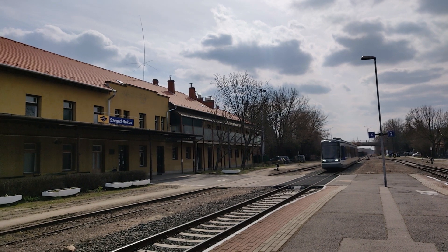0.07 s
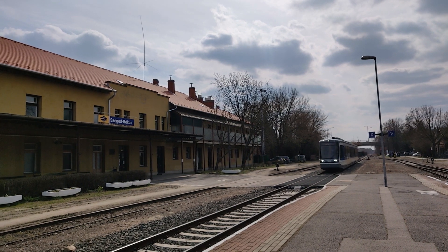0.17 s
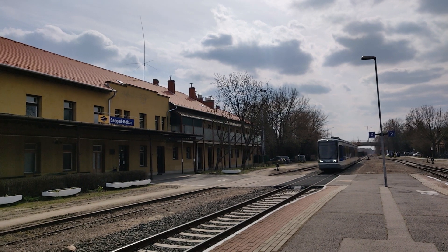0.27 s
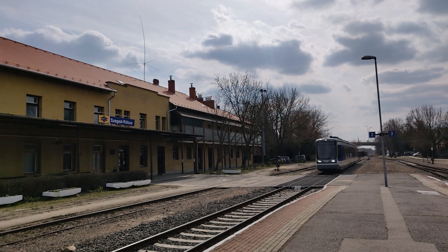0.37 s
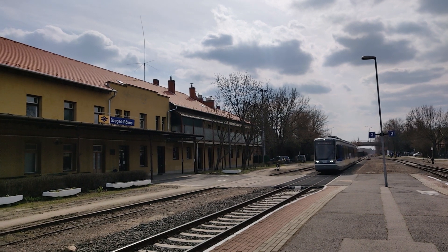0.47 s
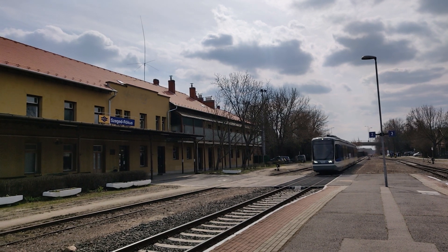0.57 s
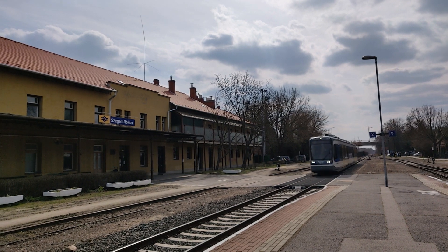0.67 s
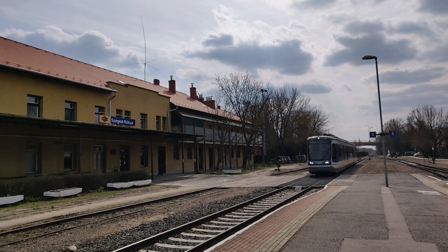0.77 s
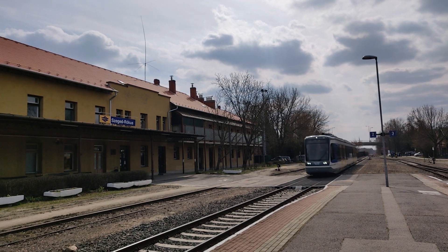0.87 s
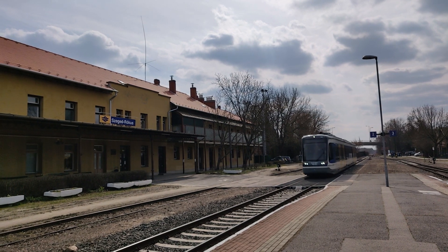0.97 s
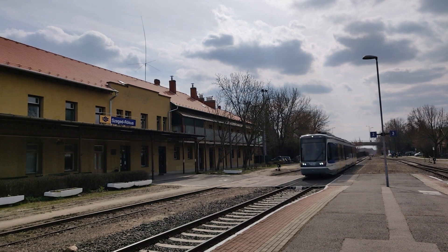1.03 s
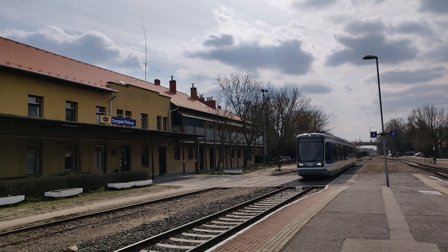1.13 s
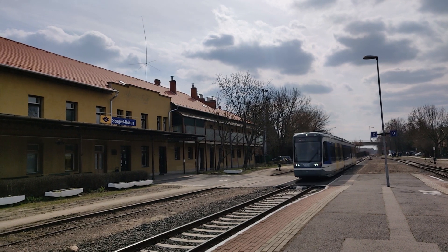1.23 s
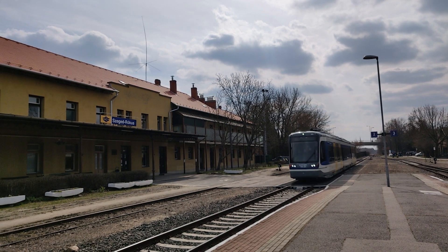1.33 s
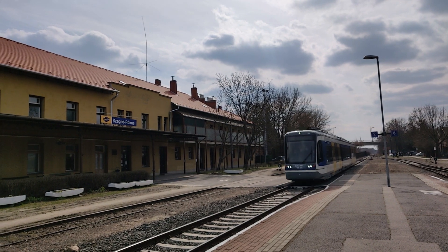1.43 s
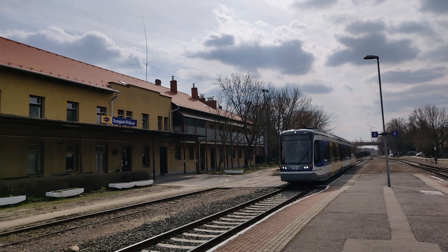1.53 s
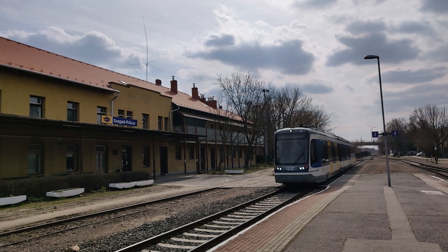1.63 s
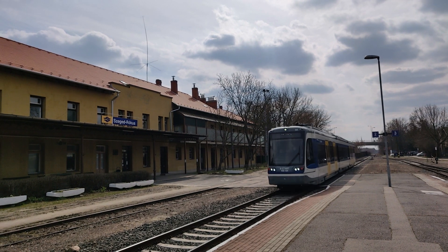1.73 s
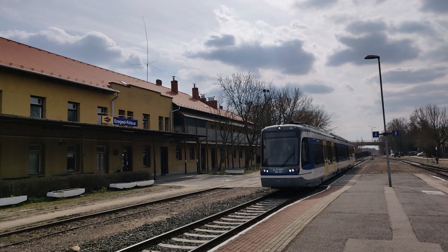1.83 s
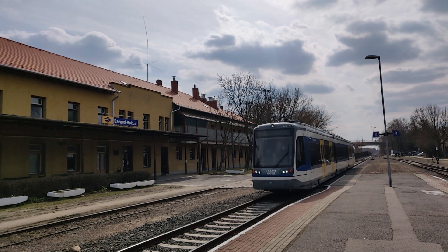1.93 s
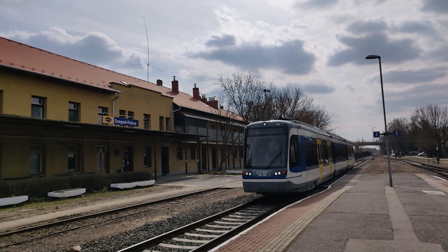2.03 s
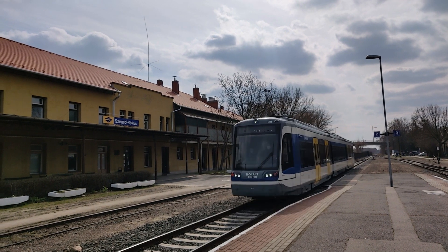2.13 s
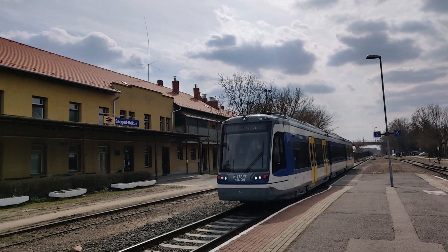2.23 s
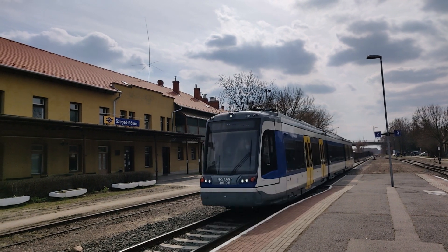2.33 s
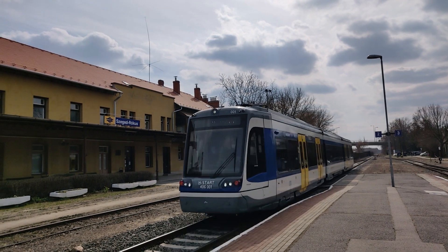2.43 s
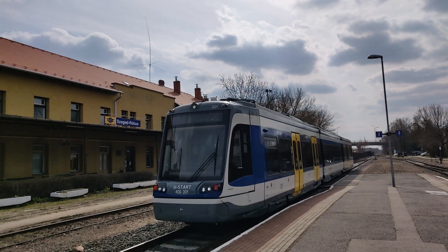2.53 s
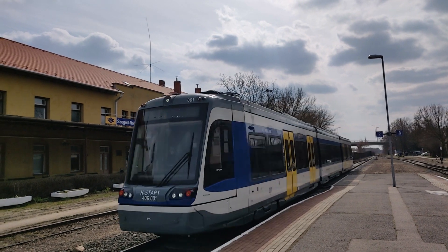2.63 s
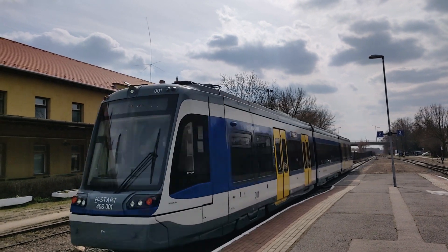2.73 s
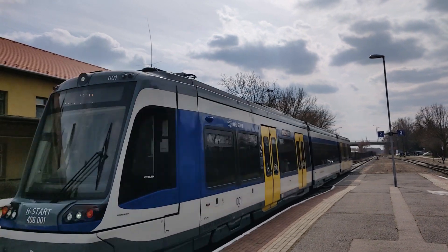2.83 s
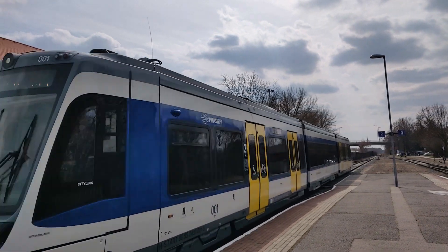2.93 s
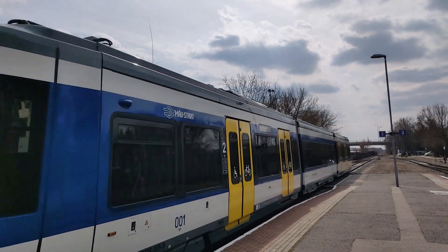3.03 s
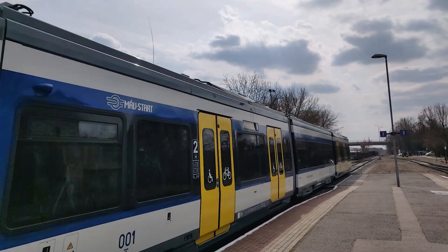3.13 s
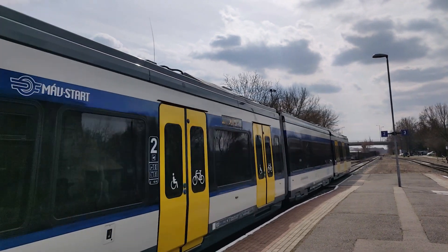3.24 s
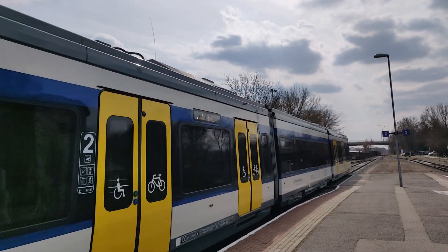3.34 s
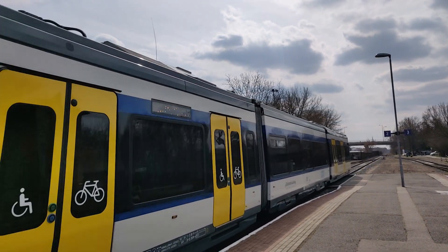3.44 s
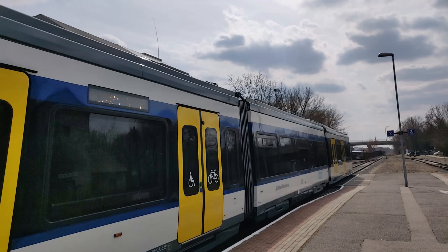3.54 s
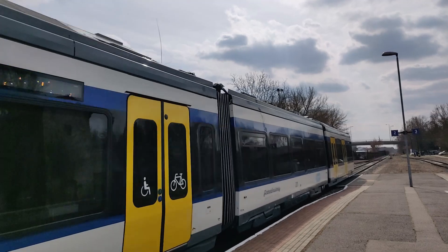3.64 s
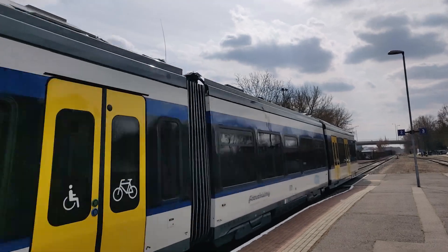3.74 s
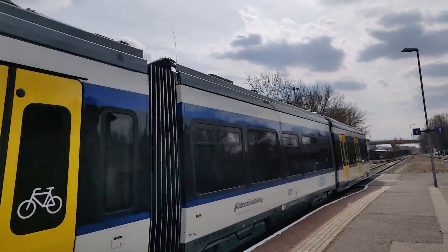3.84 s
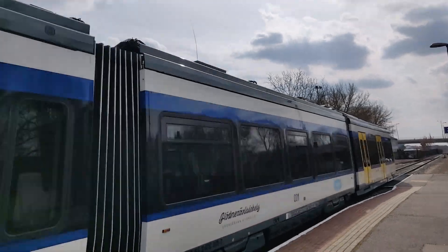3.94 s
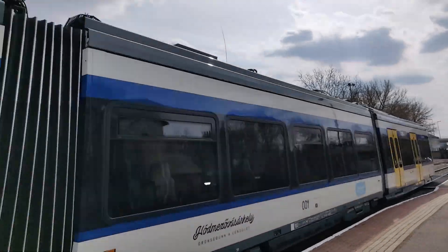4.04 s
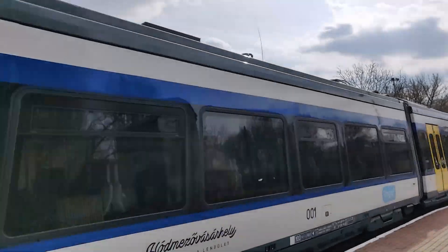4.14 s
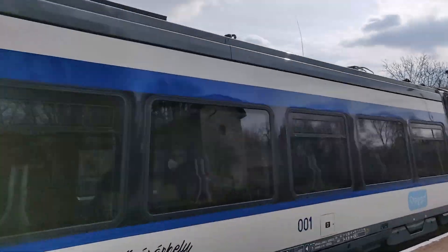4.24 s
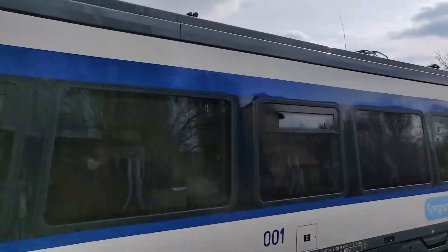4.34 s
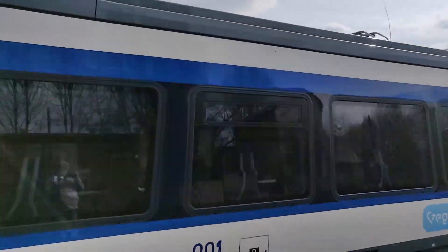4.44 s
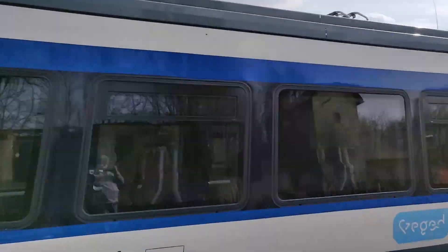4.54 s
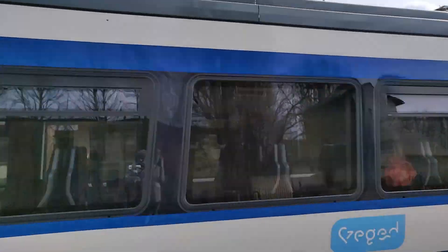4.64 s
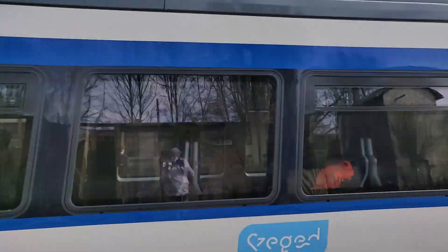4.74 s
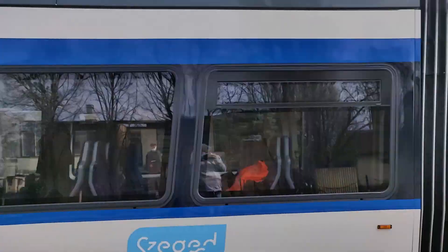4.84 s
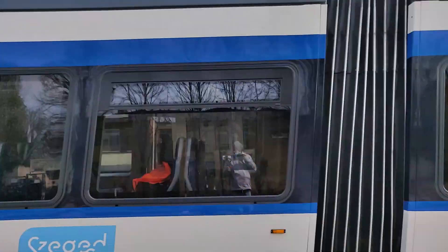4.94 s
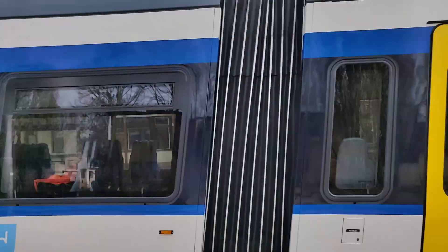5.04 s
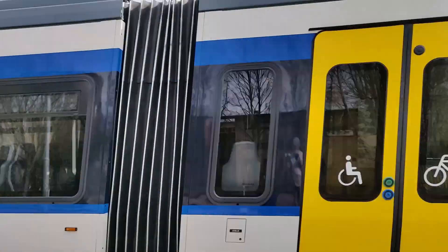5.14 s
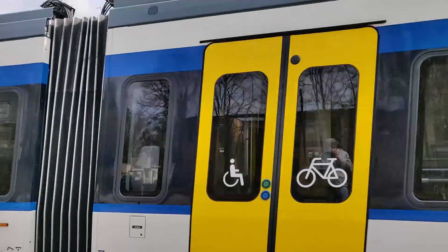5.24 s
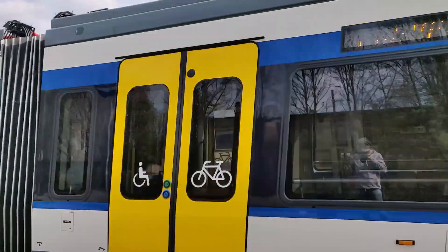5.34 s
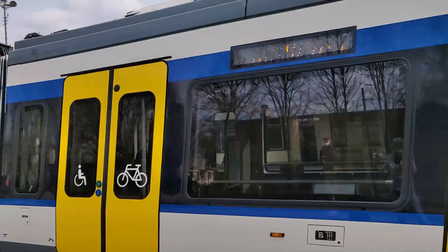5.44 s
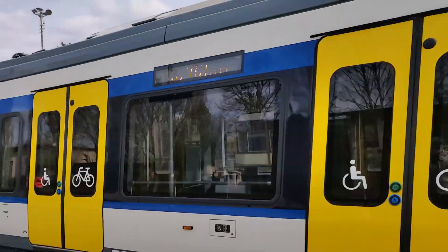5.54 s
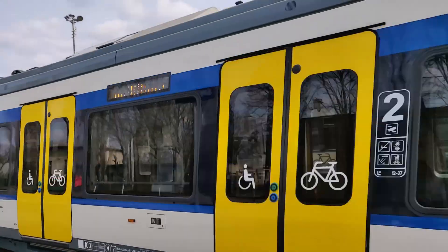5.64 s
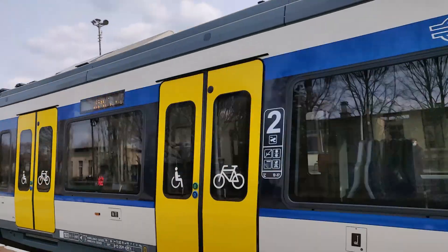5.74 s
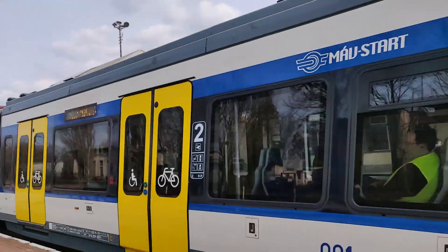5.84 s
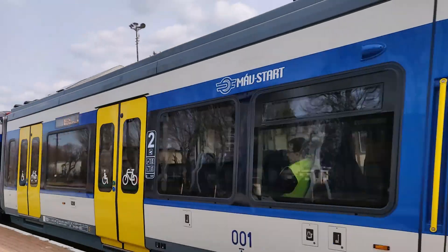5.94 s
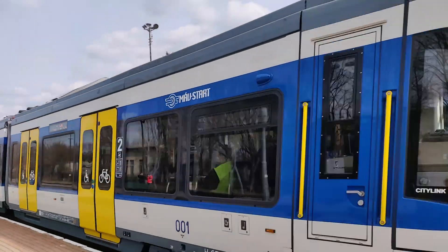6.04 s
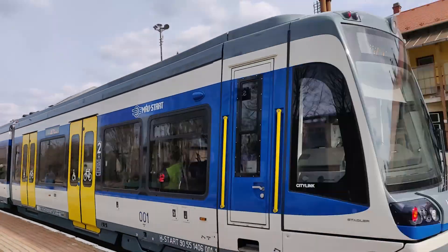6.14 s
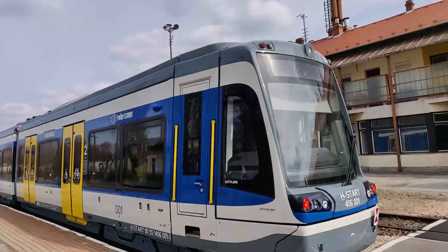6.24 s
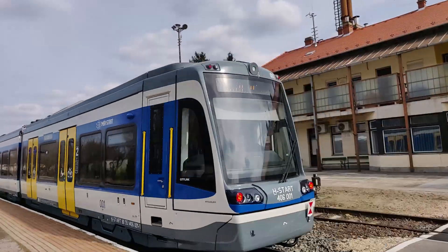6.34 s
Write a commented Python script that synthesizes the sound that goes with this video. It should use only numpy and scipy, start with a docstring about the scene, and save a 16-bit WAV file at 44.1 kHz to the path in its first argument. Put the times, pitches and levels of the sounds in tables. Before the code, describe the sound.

A tram-train swells from singing rails to a close, heavy roar of thudding, clanking wheels, then eases off under a thin rising whine.

```python
"""Heavy thuds and clanks swell, crowd together and then slow and fade, over a roar and rumble, as a tram-train passes.
Flat spots on its wheels strike the track and ring the steel; rough rolling is shaped noise that swells with each bogie.
The rails sing ahead of it and grit cracks under the wheels. Two diesels drone, and a thin drive whine, made of
wavering tones, climbs late in the pass. A mechanical camera shutter fires twice, as bursts of clacking and whirring noise.
The station front echoes the blows, open air rumbles behind, and a limiter holds the highest peaks."""
import sys
import numpy as np
from scipy import signal
from scipy.fft import rfft, irfft, next_fast_len
from scipy.io import wavfile
from scipy.ndimage import uniform_filter1d, minimum_filter1d, map_coordinates

SR = 44100
rng = np.random.default_rng(int(sys.argv[2]) if len(sys.argv) > 2 else 0)


def to_wav(sig):
    """Store sig (one row per channel, or 1-D mono) as 16-bit WAV at the path in sys.argv[1].

    Samples outside -1..1 are clipped; the rate is SR.
    """
    pcm = np.clip(np.atleast_2d(sig), -1, 1) * 32767
    pcm = np.round(pcm).astype(np.int16)
    wavfile.write(sys.argv[1], SR, pcm.T)  # frames by channels


N = 282107  # length of the scene in samples


def amp(db):
    """Turn decibels into a gain."""
    return 10 ** (np.asarray(db) / 20)


def unit(x):
    """Scale a sound to an average strength (rms) of 1."""
    return x / np.sqrt(np.mean(x ** 2) + 1e-20)


def along(points, hz):
    """Read a curve of (f/Hz, value) points, spaced evenly by pitch as the ear hears it."""
    f, v = np.transpose(points)
    return np.interp(np.log(hz + 1), np.log(f + 1), v)


def curves(rows):
    """Draw one curve over the whole scene for each column after the time."""
    s, *columns = np.transpose(rows)
    return [np.interp(np.arange(N) / SR, s, column) for column in columns]


def wobble(rate):
    """A smooth random curve with this many fresh random values a second."""
    knots = rng.standard_normal(int(N * rate / SR) + 4)
    return map_coordinates(knots, [np.arange(N) * rate / SR])


def filtered(x, response):
    """Change the strength of each frequency by a given response."""
    m = next_fast_len(N + SR // 2)
    hz = np.fft.rfftfreq(m, 1 / SR)
    return irfft(rfft(x, m) * response(hz), m)[..., :N]


def add(track, s, sound):
    """Mix a sound into the track from time s on."""
    start = max(0, round(s * SR))
    track[..., start:start + sound.shape[-1]] += sound[..., :N - start]


def leaning(pair, balance):
    """Make each frequency louder on one side, by its left-minus-right dB."""
    return filtered(pair, lambda hz: amp(np.outer([.5, -.5], along(balance, hz))))


def rush(spectrum, patchy_db):
    """Stereo noise of a given tone colour with patches of random gain; its mid, half of left plus right, has rms 1."""
    # how alike the two microphone ports hear: f/Hz, correlation
    alike = [(25, .85), (60, .965), (130, .975), (220, .93), (350, .75), (700, .35), (1300, -.1),
             (2400, .05), (5000, 0)]
    z = signal.stft(rng.standard_normal((2, N)), nperseg=1024)[2]
    patches = uniform_filter1d(rng.standard_normal(z.shape[1:]), size=5, axis=0)
    patches = unit(uniform_filter1d(patches, size=9, axis=1))
    pair = signal.istft(z * amp(patchy_db * patches), nperseg=1024)[1][:, :N]

    def mid_side_response(hz):
        turn = np.arccos(np.clip(along(alike, hz), -1, 1)) / 2
        return amp(along(spectrum, hz)) * [np.cos(turn), np.sin(turn)]

    mid, side = filtered(pair, mid_side_response)
    return np.array([mid + side, mid - side]) / np.std(mid)


def burst(t, rise, length, t60):
    """An envelope that rises, holds for its length and then dies away by 60 dB in t60 seconds."""
    return (1 - np.exp(-t / rise)) * amp(-60 * np.maximum(t - length, 0) / t60)


def ringing(modes, pitch, attack, scatter_db, window):
    """Struck modes ring at several pitches, varied for each blow; rms 1 over the first window seconds."""
    t = np.arange(SR // 3) / SR
    base, db, t60 = np.transpose(modes)[:, :, None]
    detune, strength, phase = rng.standard_normal((3, len(modes), 1))
    hz = pitch * base * (1 + .025 * detune)
    swing = np.sin(2 * np.pi * hz * t + .6 * phase)
    decay = amp(db + scatter_db * strength - 60 * t / t60)
    ring = np.sum(decay * swing, axis=0) * (1 - np.exp(-t / attack))
    return ring / np.std(ring[:round(window * SR)])


def steel_ring(modes, pitch):
    """A ring that reaches both ports directly, and differently by way of the platform edge."""
    direct, stray = (ringing(modes, pitch, attack=.0012, scatter_db=2, window=.02) for _ in range(2))
    return direct + amp(-5) * np.array([stray, -stray])


def softened(x):
    """Soften the blows by removing treble above about 7.6 kHz."""
    return signal.sosfilt(signal.butter(N=6, Wn=7600, fs=SR, output="sos"), x)


def wheel_flats():
    """Each flat thuds into the track; the nearest also ring bogie, axle box and wheel disc, and crunch at the contact."""
    # thuds, each wheel about every 0.18 s: t/s of contact, level/dB before the thud trim, f/Hz
    thud_blows = [(0.297, -25, 149), (0.423, -26, 178), (0.468, -25.5, 152), (0.652, -28, 133),
                  (0.815, -26, 148), (0.857, -30, 174), (0.941, -28, 176), (0.988, -27.5, 140),
                  (1.115, -28, 140), (1.678, -23.5, 136.6), (1.856, -21.4, 137), (2.025, -25, 194),
                  (2.203, -25.5, 156.8), (2.491, -25.5, 159.4), (2.666, -19, 154), (2.84, -17, 171),
                  (3.012, -16.5, 179.5), (3.137, -22.5, 208), (3.185, -17.5, 182.4), (3.322, -14.5, 158.4),
                  (3.359, -17, 194), (3.408, -15, 136), (3.466, -14.5, 153), (3.534, -9.5, 168),
                  (3.708, -12.5, 187), (3.755, -14, 150), (3.883, -13.5, 176), (3.929, -15, 202.5),
                  (4.058, -15.5, 166), (4.104, -11, 168.6), (4.24, -9.5, 156.5), (4.279, -13, 176),
                  (4.419, -9.5, 183.5), (4.454, -8, 167.5), (4.602, -12, 173), (4.63, -7, 175),
                  (4.786, -11, 203), (4.809, -10.5, 168), (4.864, -17.5, 128), (4.993, -10, 171),
                  (5.174, -12.5, 195), (5.358, -14.5, 177), (5.546, -12, 128), (5.632, -20, 156),
                  (5.729, -17, 122), (5.785, -15.5, 162.3), (5.919, -15.5, 130), (6.108, -21, 169),
                  (6.283, -20.5, 137)]
    # hard blows: t/s, bogie knock level/dB, axle clang level/dB, crack level/dB (all three before the trims below),
    # disc ring level/dB, pitch factor of bogie and axle, t60/s of the crunch
    hard_blows = [(3.186, -22, -24, -42, -42, 1.04, .06), (3.364, -23, -30, -34, -34, 1.04, .09),
                  (3.535, -18, -26, -28.5, -27, 1.02, .1), (3.709, -16.5, -19, -24, -28, 1.03, .06),
                  (3.884, -14, -19, -28, -30, 1.0, .1), (4.058, -10.5, -17, -28, -33, 0.99, .09),
                  (4.237, -19.5, -18, -26.5, -28, 1.02, .1), (4.279, -16, -27, -44, -48, 1, .05),
                  (4.417, -20, -22, -28.5, -24.5, 0.98, .09), (4.455, -17, -21, -43, -45, 0.97, .06),
                  (4.602, -20.5, -24, -34, -33, 0.94, .07), (4.629, -19, -20.5, -32, -36, 1.02, .07),
                  (4.783, -23, -17, -39, -42, 0.98, .05), (4.809, -16, -23, -32, -30, 0.97, .12),
                  (4.993, -24, -24, -42, -42, 0.95, .06), (5.175, -16, -34, -41, -44, 0.92, .06)]
    # what rings in the track: multiple of the thud's pitch, level/dB, t60/s
    track_modes = [(.46, -16, .12), (.75, -8, .07), (1, 0, .095), (1.24, -3, .06), (1.55, -4, .05),
                   (1.9, -5.5, .045), (2.4, -12, .035)]
    # what rings in bogie frame, axle box and wheel disc: f/Hz (times the pitch factor, for the first two), level/dB, t60/s
    bogie_modes = [(335, 1, .06), (445, 2, .055), (560, 0, .05)]
    axle_modes = [(700, -1, .05), (800, 0, .05), (890, 0, .05), (1000, -2, .045), (1120, -2, .05)]
    disc_modes = [(1570, -5, 0.06), (1800, 1, .08), (1980, -3, .07), (2310, -5, .05), (2694, -1, 0.1),
                  (2846, 0, 0.09)]
    # tone colour of the noisy parts: f/Hz, level/dB per Hz
    knock_colour = [(170, -21), (300, -7), (400, 2.5), (550, 10.5), (650, 4), (900, -42)]
    clang_colour = [(450, -28), (680, 0), (820, 10.5), (1100, -8), (1300, -12.5), (1700, -43)]
    crack_colour = [(700, -28), (1200, 1), (1550, 9), (1900, 12), (2400, 0), (2900, 0.5), (3500, -7.5),
                    (5500, -9.5), (7500, -13), (9000, -45), (15000, -72)]
    # trims on the levels of the blows
    thud_trim_db, frame_trim_db, rattle_trim_db, crunch_trim_db, bite_trim_db = 1, -1.5, -1, 1, 6
    thud_lag_s = 0.0024  # the heavy track answers a moment after the contact

    t = np.arange(SR // 3) / SR
    thuds, knocks, clangs, cracks = np.zeros((4, N))
    steel = np.zeros((2, N))
    for s, db, hz in thud_blows:
        thud = ringing(track_modes, hz, attack=.003, scatter_db=1.2, window=.03)
        add(thuds, s + thud_lag_s, amp(db) * thud)
    for s, knock_db, clang_db, crack_db, disc_db, pitch, t60 in hard_blows:
        frame = amp(knock_db) * steel_ring(bogie_modes, pitch) + amp(clang_db) * steel_ring(axle_modes, pitch)
        disc = np.array([ringing(disc_modes, 1, attack=.0005, scatter_db=3, window=.02) for _ in range(2)])
        add(steel, s, amp(frame_trim_db) * frame + amp(disc_db) * disc)
        rattle = amp(rattle_trim_db) * burst(t, rise=0.0004, length=0.004, t60=0.06)
        add(knocks, s, amp(knock_db) * rattle)
        add(clangs, s, amp(clang_db) * rattle)
        crunch = burst(t, rise=0.0003, length=0.005, t60=t60)
        add(cracks, s, amp(crack_db + crunch_trim_db) * crunch)
        # a short, sharp bite near the start of the crunch
        bite = burst(t, rise=0.0002, length=0.001, t60=0.012)
        add(cracks, s + .001, amp(crack_db + bite_trim_db) * bite)
    # keep the thuds firm, with little below 65 Hz
    thuds = signal.sosfilt(signal.butter(N=2, Wn=65, btype="high", fs=SR, output="sos"), thuds)
    # the tread chatters on the rail after a blow
    chatter = unit(amp(3.2 * wobble(330)))
    crunches = chatter * (clangs * rush(clang_colour, patchy_db=0.5) + cracks * rush(crack_colour, patchy_db=2.5))
    blows = steel + knocks * rush(knock_colour, patchy_db=3.5) + crunches
    return amp(thud_trim_db) * thuds + softened(blows)


def fading_db(metres, reach, falloff):
    """A source sounds weaker this far along the track than it does abreast."""
    return -10 * falloff * np.log10(1 + (metres / reach) ** 2)


def passing_db(sources, law):
    """Add the power of sources, each (t/s when abreast, level/dB), that travel past with the train."""
    speed_m_per_s = 10.33
    db, reach, falloff = law
    t = np.arange(N) / SR
    power = 0
    for s, strength in sources:
        power = power + amp(strength + fading_db(speed_m_per_s * (t - s), reach, falloff)) ** 2
    return db + 10 * np.log10(power)


def rolling():
    """Rough steel rolling on steel shakes the ground, the body, the rails and the wheel discs."""
    # the four bogies: t/s when abreast, level/dB of low shaking, level/dB of bright rolling noise
    bogies = [(3.36, 0.5, 1), (4.33, 3.5, -7), (5.05, -3, -1), (5.7, 0, 1)]
    # how each layer passes: base level/dB, reach/m, falloff (1 = 20 dB per tenfold distance, far off)
    rumble_law = (-22, 4.2, 0.9)
    roar_law = (-27.5, 8.65, 1.42)
    wheel_law = (-39.5, 7.76, 1.22)
    hiss_law = (-43.5, 7.96, 1.73)
    fizz_law = (-60, 3.6, 1.9)
    scrape_law = (-41, 3.7, 1.4)
    # deep boom over time: t/s, level/dB
    boom_level = [(0, -32), (2.6, -38), (3.0, -39), (3.45, -22.5), (3.75, -27), (4.1, -31), (4.4, -23),
                  (4.6, -42), (4.87, -19), (5.15, -37), (5.62, -22), (5.95, -35), (6.4, -48)]
    # tone colour of each layer; the roar differs ahead of and behind the train: f/Hz, level/dB per Hz
    boom_colour = [(25, -29), (36, -24), (48, -16), (60, -5.5), (76, -4.5), (92, -6.5), (115, -7.5),
                   (150, -16), (250, -83)]
    rumble_colour = [(70, -63), (100, -5.5), (125, -2.5), (155, 1), (200, -1.5), (245, -3.5), (310, -7.5),
                     (370, -20), (480, -18.5), (700, -74)]
    roar_ahead_colour = [(200, -6.5), (330, 1), (430, -2), (560, 0.5), (660, 2.5), (760, 4), (860, -0.5),
                         (1040, -1.5), (1180, -13), (1400, -28.5), (1900, -49)]
    roar_behind_colour = [(200, -28), (330, 0.5), (420, -2.5), (530, -2), (620, 2), (740, 2), (850, -3),
                          (1000, -8), (1200, -10), (1450, -40), (1900, -62)]
    wheel_colour = [(740, -26), (1250, 1.5), (1420, 0), (1700, 3.5), (1960, 0), (2220, 0), (2540, -4.5),
                    (2850, -1.5), (3140, -11.5), (3600, -14), (4700, -20), (7900, -79)]
    hiss_colour = [(1800, 0), (3100, -1), (3600, 0), (4400, 1), (4900, -1.5), (5280, -1), (5700, 0.5),
                   (7100, 1.5), (7750, -3), (8400, -13.5), (9600, -22.5), (13000, -30)]
    fizz_colour = [(6000, -40), (8500, -4), (10000, -3.5), (12000, 0), (13500, 0), (14500, -6),
                   (15800, -14)]
    scrape_colour = [(800, -24.5), (1100, 8), (1400, -1), (1850, 0), (2700, 3), (3400, -17), (6800, -30),
                     (9000, -48)]

    shaking = [(s, low_db) for s, low_db, _ in bogies]
    singing = [(s, bright_db) for s, _, bright_db in bogies]
    roughness = wobble(35)  # patches of rail surface, felt by most layers
    grit = wobble(160)  # single rough spots under the treads

    boom_db, = curves(boom_level)
    boom = amp(boom_db + 1.7 * roughness) * rush(boom_colour, patchy_db=4.0)

    rumble_db = passing_db(shaking, rumble_law) + 1.0 * roughness + 0.12 * wobble(8.8)
    rumble = amp(rumble_db) * rush(rumble_colour, patchy_db=0.1)

    # blend from the roar ahead to the roar behind
    gone, = curves([(3.8, 0), (5.2, 1)])
    roar_ahead = np.sqrt(1 - gone) * rush(roar_ahead_colour, patchy_db=1.0)
    roar_behind = np.sqrt(gone) * rush(roar_behind_colour, patchy_db=1.0)
    roar_db = passing_db(singing, roar_law) + 0.5 * roughness + 0.85 * grit + 0.16 * wobble(5.9)
    roar = amp(roar_db) * (roar_ahead + roar_behind)

    wheel_db = passing_db(singing, wheel_law) + .5 * roughness + 0.11 * grit
    wheels = amp(wheel_db) * rush(wheel_colour, patchy_db=1.9)

    hiss_db = passing_db(singing, hiss_law) + 0.99 * roughness + 0.24 * grit
    hiss = amp(hiss_db) * rush(hiss_colour, patchy_db=2.0)

    # fine treble fizz: a faint steady part, and a part that passes with the drive at 5.43 s
    fizz_gain = amp(-73) + amp(passing_db([(5.43, 0)], fizz_law))
    fizz = fizz_gain * rush(fizz_colour, patchy_db=4.0)

    # the leading wheels scrape as they come abreast at 3.54 s
    scrape_db = passing_db([(3.54, 0)], scrape_law) + 3 * grit
    scrape = amp(scrape_db) * rush(scrape_colour, patchy_db=1.5)
    return boom + rumble + roar + wheels + scrape + hiss + fizz


def crushed_grit():
    """Grains of uneven size crack under the nearest wheels, each a tiny dying burst of noise."""
    # t/s, level/dB
    grit_level = [(2.6, -58), (3.3, -44), (3.9, -43), (4.5, -48), (5.0, -41), (5.6, -48), (6.4, -49)]
    # f/Hz, level/dB per Hz
    grit_colour = [(700, -19), (1100, 5), (1900, 3), (2900, -4), (3500, -15.5), (7000, -34), (9000, -50)]
    grains_per_s, spread_db, life_s = 160, 2.5, .003
    db, = curves(grit_level)
    grains = (rng.random(N) < grains_per_s / SR) * amp(spread_db * rng.standard_normal(N))
    # overlapping grains add their power
    power = signal.lfilter([1], [1, -np.exp(-2 / (life_s * SR))], grains ** 2)
    noise = np.sqrt(power) * rng.standard_normal((2, N))
    return amp(db) * unit(filtered(noise, lambda hz: amp(along(grit_colour, hz))))


def humps(resonances):
    """Each resonance favours a band of pitches; their gains add up to one (f/Hz, level/dB) curve."""
    hz = np.geomspace(100, 16000, 700)
    gain = sum(amp(db) / (1 + (2 * (hz - centre) / width) ** 2) for centre, width, db in resonances)
    return np.column_stack([hz, 20 * np.log10(gain)])


def rail_song():
    """The rails carry the wheels' noise ahead of the train and ring in their own resonances."""
    # f/Hz, width/Hz, level/dB
    resonances = [(493, 95, 0), (670, 110, -1.5), (863, 210, 5), (1590, 200, -4), (1725, 160, -4.5),
                  (3480, 70, -9.5), (4120, 370, -19), (7000, 350, -21.5)]
    # t/s, level/dB
    rail_level = [(0, -52), (.8, -45.5), (1.5, -40.5), (2.4, -38), (3.0, -35.5), (3.6, -48), (4.2, -70)]
    db, = curves(rail_level)
    return amp(db + 1.0 * wobble(13)) * rush(humps(resonances), patchy_db=2.5)


def engine(rows, orders, unsteady_db):
    """A diesel's exhaust note: a firing tone and locked overtones, each swelling a little on its own."""
    hz, firing_db, overtone_db = curves(rows)
    phase = 2 * np.pi * np.cumsum(hz * (1 + 0.00413 * wobble(5.5))) / SR
    firing = amp(firing_db + 1.5 * wobble(5)) * unit(np.sin(phase))
    overtones = 0
    for multiple, level in orders:
        swell = amp(level + unsteady_db * wobble(5.9))
        overtones = overtones + swell * np.sin(multiple * phase + rng.uniform(0, 2 * np.pi))
    started = np.arange(N) / SR >= rows[0][0]
    return started * (firing + amp(overtone_db) * unit(overtones))


def tone(rows, waver, flutter_db, shadow_db):
    """A drive tone, wavering in pitch and fading on its own way to each port."""
    hz, db = curves(rows)
    phase = 2 * np.pi * np.cumsum(hz * (1 + waver * wobble(200))) / SR
    onset = np.clip((np.arange(N) / SR - rows[0][0]) / 0.055, 0, 1)
    shadow = amp(shadow_db * wobble(31))  # skirts and bogie frames pass in front of it
    ports = [amp(flutter_db * wobble(70)) * np.sin(phase + 0.093 * wobble(27)) for _ in range(2)]
    return onset * amp(db) * unit(shadow * np.array(ports))


def whine():
    """The drive sings a thin line over a rough fringe, flaring up in short squeals."""
    # t/s, f/Hz, level/dB of the steady line
    whine_line = [(4.7, 5320, -62), (4.85, 5370, -60), (4.98, 5365, -59), (5.1, 5310, -58),
                  (5.24, 5245, -56), (5.33, 5370, -56), (5.42, 5440, -56), (5.49, 5580, -54),
                  (5.63, 5720, -51), (5.73, 5825, -48), (5.84, 5895, -47), (6.0, 5980, -50),
                  (6.1, 6020, -52), (6.4, 6055, -53)]
    # t/s at the crest, length/s, level/dB before the squeal trim
    squeals = [(4.745, .035, -50), (4.8, .03, -52), (4.9, .025, -51), (4.975, .04, -45), (5.095, .06, -43),
               (5.2, .03, -46), (5.247, .03, -42), (5.32, .04, -45), (5.42, .04, -47), (5.487, .03, -42),
               (5.555, .035, -41), (5.735, .05, -41), (5.84, .09, -38), (6.0, .05, -41), (6.06, .025, -47),
               (6.135, .04, -47), (6.225, .04, -41), (6.285, .035, -44), (6.355, .04, -43)]
    squeal_trim_db = -1
    t = np.arange(N) / SR
    _, steady_db = curves(whine_line)
    flares = sum(amp(db + squeal_trim_db) * np.exp(-2 * ((t - s) / length) ** 2) for s, length, db in squeals)
    swell = np.hypot(1, flares / amp(steady_db))
    line = tone(whine_line, waver=.003, flutter_db=2.5, shadow_db=.5)
    fringe = amp(-9) * tone(whine_line, waver=.022, flutter_db=3, shadow_db=1)
    return swell * (line + fringe)


def drive():
    """Two diesels drone; the traction motors hum and whine, and their gears sing ahead and as the bogie goes by."""
    # engines: t/s, firing rate f/Hz, level/dB of the firing tone, level/dB of the overtones
    front_engine = [(0, 59.1, -42, -33.5), (1.2, 58.9, -45, -40.5), (1.7, 59.63, -38, -33.5),
                    (3.7, 59.34, -34, -32.5), (4.2, 57.5, -52, -54), (6.4, 55.6, -76, -69)]
    rear_engine = [(4.6, 76.3, -47, -52), (4.88, 75.6, -25, -28.5), (5.2, 74.8, -31, -30),
                   (5.6, 75.37, -27, -20.5), (5.8, 75.87, -34, -23), (6.0, 76.34, -35, -29),
                   (6.4, 76.9, -32, -20.5)]
    # their overtones: multiple of the firing rate, level/dB against each other
    front_orders = [(1.5, -5), (2, 0.5), (3, -24), (4, -4), (5, -26)]
    rear_orders = [(1.5, -4.5), (2, 1.5), (3, -19), (4, -11.5), (5, -13)]
    # gears ahead of the train, gears of the passing bogie, and rear motors: t/s, f/Hz, level/dB
    gear_ahead = [(0, 744, -65), (1.4, 738, -47), (2.6, 750.7, -39.5), (3.4, 740, -49), (4, 720, -81)]
    gear_passing = [(4.9, 523, -71), (5.15, 519, -31), (5.33, 512, -29), (5.5, 502, -39), (5.85, 468, -43),
                    (5.98, 464.6, -32), (6.4, 461, -36)]
    motor_hum = [(5.8, 209, -48), (6.08, 204, -24), (6.4, 199.6, -31.5)]
    diesels = engine(front_engine, front_orders, unsteady_db=4.0)
    diesels = diesels + engine(rear_engine, rear_orders, unsteady_db=4.5)
    gears = tone(gear_passing, waver=0.006, flutter_db=2, shadow_db=1.2)
    gears = gears + tone(gear_ahead, waver=0.012, flutter_db=2.5, shadow_db=1.5)
    motors = tone(motor_hum, waver=0.012, flutter_db=2, shadow_db=1.5)
    return diesels + whine() + gears + motors


def shutter():
    """Mirror and springs whirr, the curtain clacks, and the mirror drops back."""
    # releases: t/s, level/dB
    shots = [(1.9586, -21.5), (2.7696, -21.5)]
    # parts of one release: delay/s, level/dB against the release, rise/s, length/s, t60/s, clack share (0 to 1)
    strokes = [(-.054, -13, .004, .005, .03, .4), (-.048, -16.5, .004, .026, .045, .15),
               (0, 0.5, .001, .0035, .018, 1), (.005, -15, .002, .012, .05, .3),
               (.0195, -7, .0004, .001, .007, .6), (.0228, -3, .0004, .001, .009, .4),
               (.026, -9.5, .002, .008, .05, .2)]
    # f/Hz, level/dB per Hz
    clack_colour = [(600, -25), (1800, -9), (3300, -10.5), (4500, -9), (5500, -5), (7000, 1), (8200, -8),
                    (9500, -20), (13000, -15), (16000, -16)]
    whirr_colour = [(600, -22), (1800, -2), (3200, 0), (5000, -2), (7200, 1.5), (9000, -11), (11500, -11),
                    (14500, -4), (16000, -8)]
    # f/Hz, left minus right/dB
    side_balance = [(1000, 0), (2400, -3.5), (7000, -2.5), (9000, -9), (15000, -11)]
    t = np.arange(SR // 5) / SR
    clacks, whirrs = np.zeros((2, N))
    for s, db in shots:
        for delay, part_db, rise, length, t60, share in strokes:
            stroke = amp(db + part_db) * burst(t, rise, length, t60)
            add(clacks, s + delay, np.sqrt(share) * stroke)
            add(whirrs, s + delay, np.sqrt(1 - share) * stroke)
    # tiny contacts of levers and gear teeth
    chatter = amp(2.9 * wobble(700))
    sound = clacks * rush(clack_colour, patchy_db=1) + whirrs * chatter * rush(whirr_colour, patchy_db=1)
    return leaning(sound, side_balance)


def station(x):
    """The station front answers with a dying tail that builds up late and loses its treble first."""
    # f/Hz, t60/s
    echo_decay = [(100, 1), (1000, 1), (8000, 0.55)]
    hz, t, z = signal.stft(rng.standard_normal((2, SR // 2)), SR, nperseg=256)
    decay = amp(-60 * t / along(echo_decay, hz)[:, None])
    tail = signal.istft(z * decay, SR, nperseg=256)[1]
    tail = tail * np.clip(np.arange(tail.shape[1]) / SR / 0.019, 0, 1)
    return signal.fftconvolve(x, tail / np.linalg.norm(tail[0]), axes=1)[:, :N]


def open_air():
    """A deep, unsteady rumble of low noise that mostly dies down as the train arrives."""
    # t/s, level/dB
    air_level = [(0, -39.5), (2, -45), (3.7, -41), (4.4, -48), (5.0, -51), (6.4, -63)]
    # f/Hz, level/dB per Hz
    air_colour = [(15, -22.5), (25, 2), (36, -12), (50, -11), (75, 3), (110, -11), (250, -76)]
    air_db, = curves(air_level)
    return amp(air_db + 1 * wobble(3.0)) * rush(air_colour, patchy_db=2.5)


def scene():
    """The train with the echo of its blows, the open air, and the shutter beside the microphone."""
    # f/Hz, left minus right/dB
    train_balance = [(60, 1), (110, 1), (200, 0), (380, 0), (700, 2), (1290, -0.5), (2380, -0.5), (4400, 3),
                     (8120, 0), (15000, -1.5)]
    blows = wheel_flats()
    echo = amp(-34.5) * station(blows)
    train = blows + rolling() + crushed_grit() + rail_song() + drive() + echo
    return leaning(train, train_balance) + open_air() + shutter()


def record(dry):
    """A fast limiter turns down the peaks; then everything above the band limit is removed."""
    ceiling, top_hz = .88, 15850
    needed = np.minimum(1, ceiling / (np.abs(dry).max(axis=0) + 1e-9))
    # hold the lowest gain for about 9 ms, then smooth it over about 7 ms
    gain = uniform_filter1d(minimum_filter1d(needed, size=400), size=300)
    return filtered(dry * gain, lambda hz: hz < top_hz)


dry = scene()
out = record(dry)
to_wav(out)
```